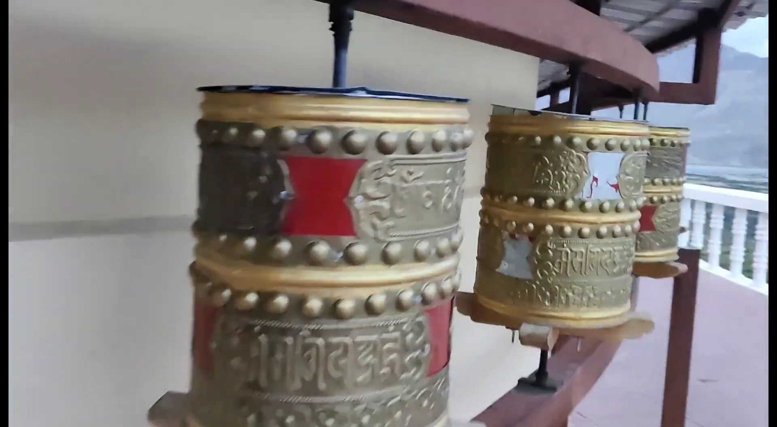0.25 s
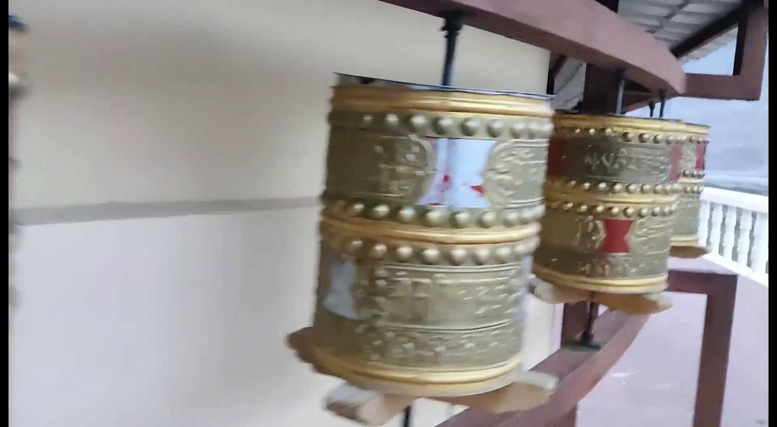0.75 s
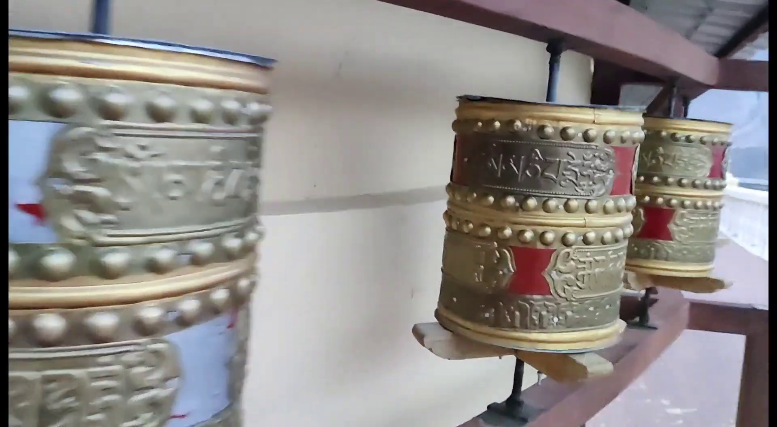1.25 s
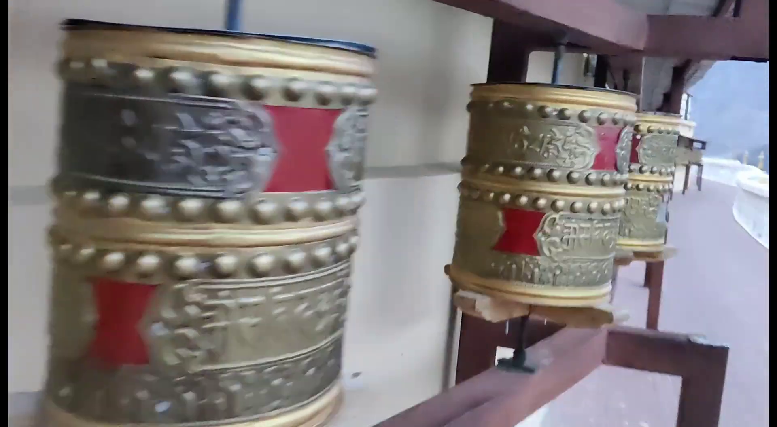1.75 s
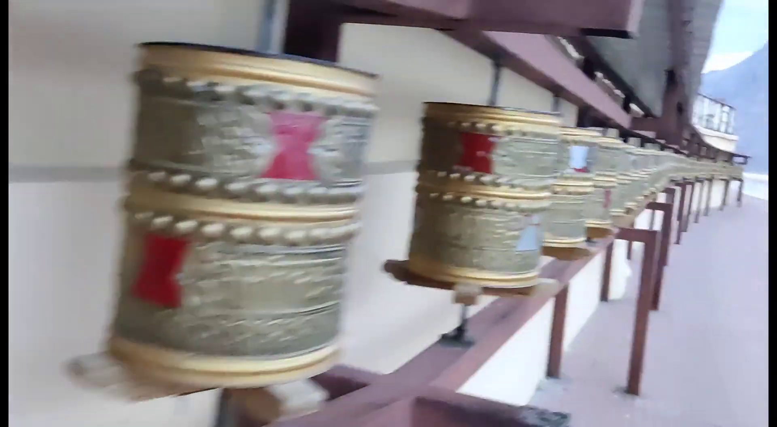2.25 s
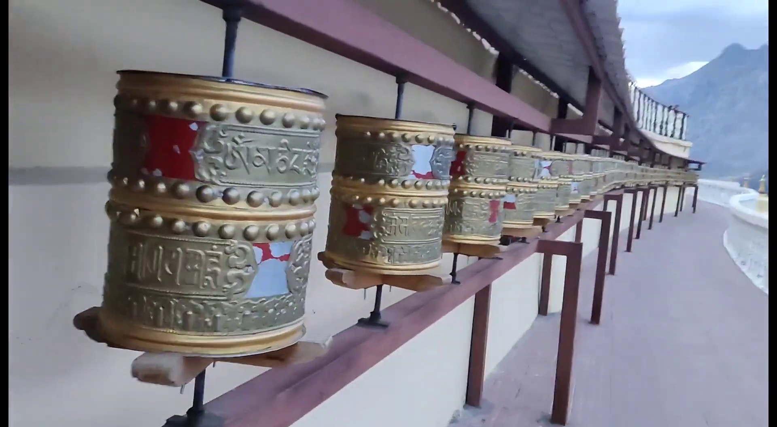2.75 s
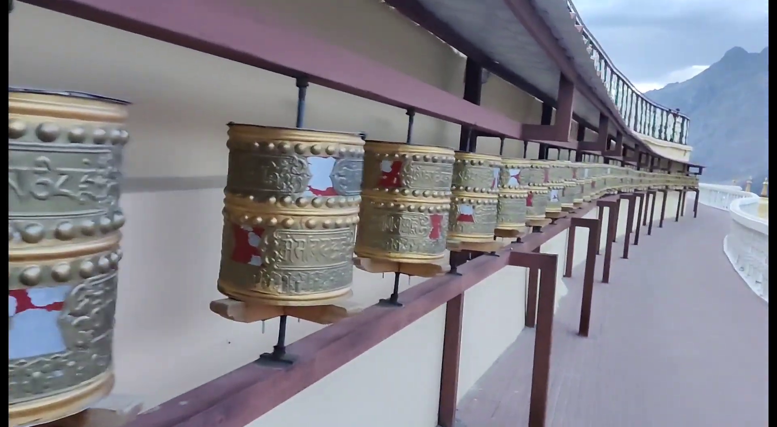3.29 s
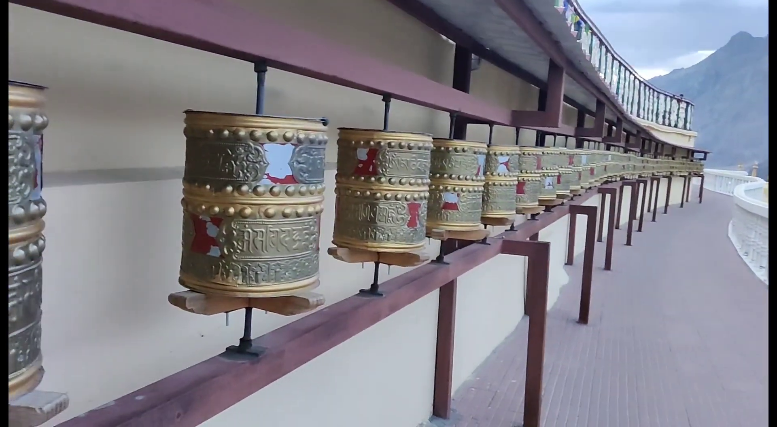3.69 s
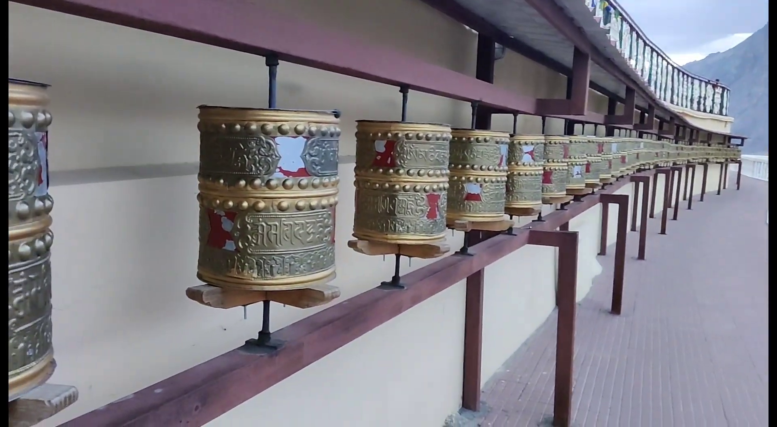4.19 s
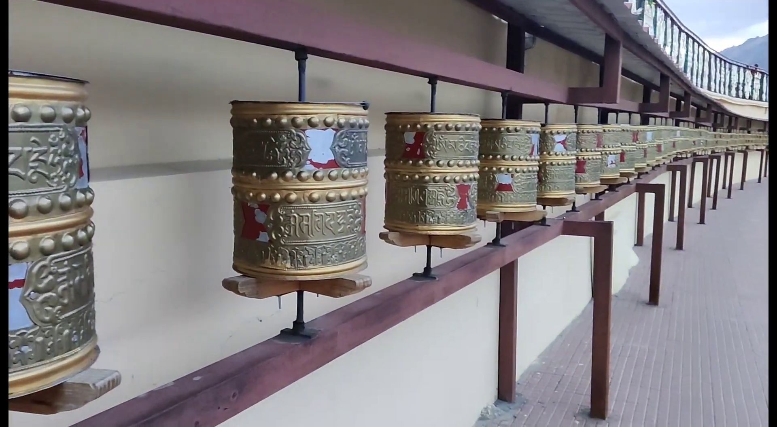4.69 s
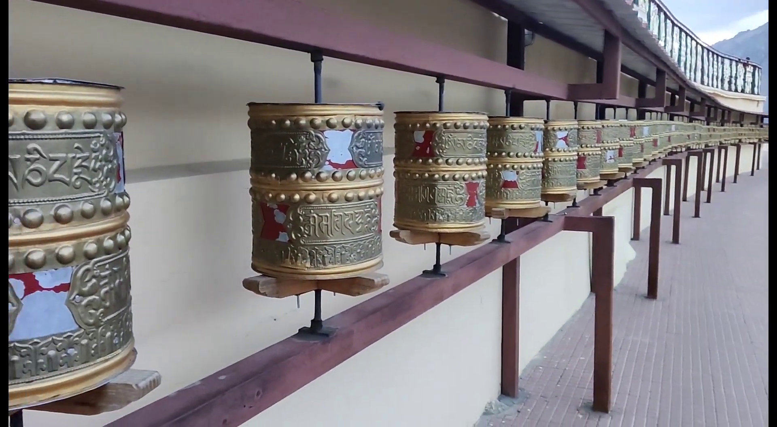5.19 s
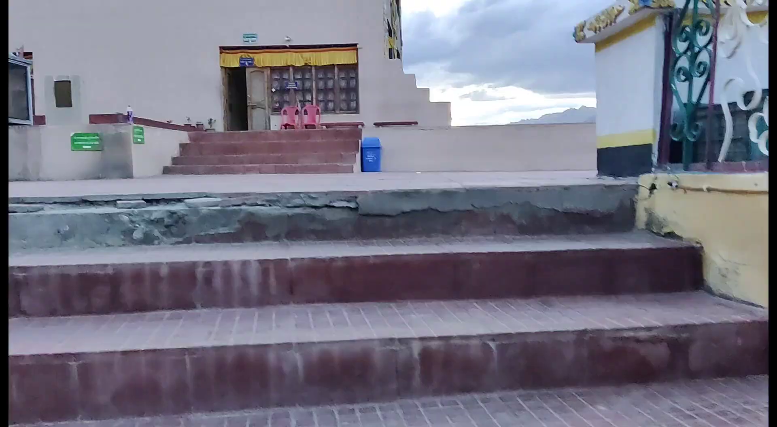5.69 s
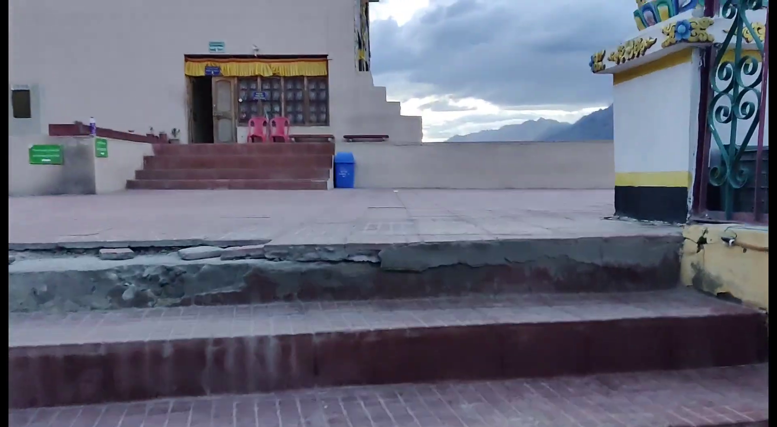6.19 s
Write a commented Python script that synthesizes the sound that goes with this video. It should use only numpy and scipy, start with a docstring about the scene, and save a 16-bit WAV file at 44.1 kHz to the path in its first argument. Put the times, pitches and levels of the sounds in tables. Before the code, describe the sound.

Outdoors beneath a gallery, close to a handheld stereo microphone, loose brass drums are spun in passing. From 0.1 s they knock and chatter on dry iron axles, giving clustered metallic ticks and short, uneven rings, over a wavering low hum and soft wind. Pushes thud at about 0.6 and 0.9 s with wooden clunks and strong knocks; a gust follows, then heavy dull microphone bumps on the left at 1.2-1.35 s. Cloth brushes and axles rub faintly. More shoves come at 1.7-1.8, 2.4 and 2.74 s, the last bringing the brightest, loudest clank. The hum softens and the wheels coast, with irregular knocks, notably at 3.4, 4.15 and 5.4 s. Around 5.68 s everything cuts off. A far quieter place fades in by 6 s: faint bands of hiss, a soft heel thump at 6.04 s and a barely audible step near 6.4 s.

```python
"""A row of embossed brass prayer wheels is spun by hand, one after another, under an outdoor gallery.
The loose drums knock and chatter on their iron axles: bursts of tiny hits set off noise tails and fading tones.
Pushes thud in the frame, wood clunks, dry axles rub and cloth hisses, all made from hits or shaped noise.
Wavering low tones make a hum, and swelling low noise makes wind on the microphone, which is also bumped.
The sound breaks off, and a quieter place fades in, with faint bands of soft hiss and footsteps on stone."""
import sys
import numpy as np
from scipy import signal
from scipy.fft import rfft, irfft, next_fast_len
from scipy.io import wavfile
from scipy.ndimage import uniform_filter1d, map_coordinates

SR = 44100
rng = np.random.default_rng(int(sys.argv[2]) if len(sys.argv) > 2 else 0)


def pcm_store(signal):
    """Save signal as 16-bit PCM."""
    levels = np.round(np.clip(np.atleast_2d(signal), -1, 1) * 32767)
    wavfile.write(sys.argv[1], SR, levels.astype(np.int16).T)


N = 284268
T = np.arange(N) / SR  # time in the whole scene, in seconds
BLOW = np.arange(SR * 2 // 5) / SR  # time within one short sound, in seconds

# In the event tables, level_db is set before the small overall trim of each layer.
# In the spectrum tables, only the shape counts: the layers set their own loudness.
# t60_s is the time a sound takes to die away by 60 dB.

# a drum knocks on its axle: start_s, level_db, chatter_s (2 ms at least), hardness_db_per_octave
KNOCKS = [(0.126, -30, .005, 1.5), (0.139, -25, 0.0013, 2.5), (0.279, -31.5, 0.0045, 2),
          (0.521, -33, 0.0028, 3), (0.534, -24, 0.0024, -5), (0.5728, -29.5, 0.007, 4.5),
          (0.7234, -21, .006, 3), (0.827, -35.5, .002, 1.5), (0.853, -20, 0.0037, -2.5),
          (0.9258, -20.5, .004, 2.5), (0.9476, -19, 0.0023, 8), (1.1151, -29.5, 0.0021, 3.5),
          (1.397, -32.5, .005, -2), (1.423, -29, 0.003, -1.5), (1.505, -24, 0.003, 1.5),
          (1.556, -31.5, .009, 8.5), (1.649, -31, 0.0055, 2), (1.668, -27, .0045, -1.5),
          (1.8084, -26, 0.0096, 1.5), (1.8374, -28, 0.0021, 1), (1.9049, -28, .002, 2),
          (1.948, -28, 0.035, -1.5), (1.9834, -24.5, 0.018, 2), (2.0248, -19.5, 0.0024, 2),
          (2.129, -27.5, .016, 2.5), (2.238, -34, 0.0037, 1), (2.309, -24, 0.0067, 2),
          (2.3228, -22, .002, 0.5), (2.3785, -25.5, .008, 2.5), (2.452, -29.5, 0.0099, -0.5),
          (2.557, -31.5, 0.0073, 1.5), (2.595, -23.5, 0.0045, -0.5), (2.63, -26.5, 0.02, 6),
          (2.7069, -23, 0.01, 8), (2.7414, -15, 0.0026, 7), (2.809, -22, .005, 9.5),
          (2.8225, -23.5, 0.0018, 8), (2.859, -22.5, 0.016, 3.5), (2.919, -28.5, 0.0027, 9),
          (3.132, -27, 0.016, 6), (3.176, -35, .01, -3), (3.264, -28, .012, 4.5), (3.2979, -28.5, 0.007, 4),
          (3.405, -20.5, 0.0047, 4), (3.4357, -27.5, 0.005, 3), (3.5709, -30.5, .003, 1.5),
          (3.617, -35, 0.03, 2), (3.719, -40.5, 0.0037, 1), (3.8015, -30, 0.0016, 3),
          (3.916, -29.5, 0.038, 0.5), (4.001, -26, 0.0065, 2), (4.0395, -25, 0.0084, 1),
          (4.0961, -25.5, 0.0097, 2), (4.1494, -20.5, 0.0047, 11), (4.2822, -26.5, .002, 5.5),
          (4.347, -46, 0.0023, 1), (4.3805, -31, 0.0079, 4), (4.439, -28, .002, 1.5), (4.559, -29, .01, 2),
          (4.602, -31, .003, 1), (4.656, -36.5, 0.0071, 3), (4.678, -32, 0.0077, 2.5),
          (4.718, -37, 0.02, -4), (4.7601, -28, 0.0049, 3), (4.833, -29.5, 0.01, 0.5),
          (4.886, -26.5, 0.011, 3.5), (4.934, -35, 0.0092, 0.5), (5.117, -31.5, 0.024, 1),
          (5.1472, -25, .009, 3), (5.208, -35, 0.0073, -1), (5.245, -29.5, 0.026, 0),
          (5.2926, -28.5, 0.0085, 0.5), (5.4054, -21, 0.0035, 2), (5.439, -27, 0.029, 1),
          (5.5039, -30, .012, 1), (5.642, -34.5, 0.0019, -4)]
# loudness of the axle rattle over time: time_s, level_db
RATTLE_LEVEL = [(0.0, -35.5), (0.12, -39), (0.3, -42), (0.39, -49), (0.47, -54), (0.7, -37), (1.22, -32),
                (1.48, -43.5), (1.6, -33.5), (1.78, -46), (1.89, -40), (1.97, -38), (2.2, -35.5),
                (2.53, -38), (2.8, -29), (3.04, -39.5), (3.2, -30.5), (3.34, -33), (3.53, -43.5),
                (3.68, -44.5), (3.88, -43.5), (4.08, -34.5), (4.5, -40), (4.83, -38), (5.05, -43.5),
                (5.6, -42.5)]
# a knock leaves one group of drum tones singing: start_s, centre_pitch_hz, level_db, t60_s
SINGING_TONES = [(0.279, 2050, -43, 0.81), (0.521, 880, -37, 0.78), (0.534, 713, -34.5, 0.27),
                 (0.573, 1680, -30, 0.27), (0.723, 1693, -25.5, 0.17), (0.723, 2530, -42, 0.15),
                 (0.853, 1850, -28.5, 0.26), (0.853, 1237, -31, 0.23), (0.853, 905, -39, 0.35),
                 (0.948, 2046, -24.5, 0.46), (1.115, 892, -35.5, 0.63), (1.505, 2020, -32.5, 0.28),
                 (1.668, 1330, -52, .5), (1.837, 2460, -29, 0.25), (2.025, 1676, -31, .3),
                 (2.025, 2810, -30, 0.22), (2.63, 1658, -25, 0.54), (2.741, 4350, -32.5, 0.16),
                 (2.809, 2590, -26.5, 0.44), (2.859, 3101, -31, 0.19), (2.919, 842, -35.5, .4),
                 (3.132, 1590, -34, 0.41), (3.298, 1600, -29, 0.24), (3.405, 2713, -29.5, 0.25),
                 (3.571, 4276, -39, 0.32), (4.149, 2525, -32, 0.29), (4.282, 1624, -33.5, .5),
                 (4.602, 1655, -34.5, 0.26), (4.76, 1630, -37, .48), (4.886, 4393, -32, 0.4),
                 (5.293, 1670, -38, 0.33)]
# an axle rubs in one resonance of its drum: crest_s, half_length_s, pitch_hz, width_hz, level_db,
# glide_hz_per_s
RUBS = [(0.06, 0.088, 2970, 450, -49, 0), (1.246, 0.096, 3050, 398, -41, 0),
        (2.195, .074, 3170, 300, -38, -1200), (3.665, 0.062, 4285, 120, -51, 0),
        (4.084, .07, 4300, 120, -45, 0), (4.068, 0.06, 2170, 200, -37, -6000),
        (5.192, 0.044, 2220, 248, -39, -5000), (5.629, 0.045, 3360, 299, -45.5, 2)]
# the hand shoves a wheel by its wooden handle: start_s, frame_thud_db, sharp_tick_db
PUSHES = [(0.134, -30, -34.5), (0.568, -35, -40), (0.854, -19.5, -39), (0.935, -25, -52.5),
          (1.668, -29, -34.5), (1.826, -28.5, -57), (2.3793, -23, -30.5), (2.74, -29.5, -36.5)]
# a wooden handle clunks and shudders: start_s, level_db, chatter_s (2 ms at least)
CLUNKS = [(0.13, -32, 0.0076), (0.725, -42, 0.012), (0.857, -31.5, 0.014), (0.952, -42, 0.012),
          (2.321, -31, 0.032), (2.385, -32, 0.044), (2.595, -33, 0.002), (2.705, -36.5, .005),
          (2.745, -31.5, .012), (2.823, -33.5, .012), (4.172, -44.5, 0.018)]
# a sleeve brushes over a drum: crest_s, half_length_s, level_db
SWISHES = [(0.06, 0.08, -41.5), (0.25, 0.1, -36.5), (1.27, 0.15, -40.5), (2.16, 0.17, -38),
           (2.85, 0.078, -37), (3.04, 0.26, -44.5)]

# spectrum of the sheet-brass drum: frequency_hz, level_db_per_hz
SHELL_SPECTRUM = [(290, -41.5), (500, -10.5), (740, -9), (900, -5), (1200, -6.5), (1600, 0.5), (2000, 0.5),
                  (2500, 1), (3400, -2.5), (4400, -5.5), (5200, -7.5), (6000, -9), (8000, -22),
                  (15500, -42)]
# the drum's clearest tones before random detuning, many in close pairs: pitch_hz, level_db
DRUM_TONES = [(680, -7.5), (800, -6), (890, -3), (1380, -1), (1490, 5.5), (1650, 4.5), (1705, -2.5),
              (1845, -1), (2085, -23), (2430, 3), (2545, 1), (2680, -4.5), (3270, -1.5), (4275, -4.5),
              (4330, -3), (4405, 0.5), (4700, -7.5), (5260, -17), (5730, -1.5), (5810, -2)]
# spectrum of the shaken frame: frequency_hz, level_db_per_hz
FRAME_SPECTRUM = [(40, -20), (90, -1.5), (135, 2.5), (175, -1), (230, -4), (300, -6.5), (430, -6),
                  (550, -14), (800, -11.5), (1500, -37.5), (4000, -72)]
# spectrum of hard metal contact: frequency_hz, level_db_per_hz
EDGE_SPECTRUM = [(3000, -37.5), (6000, 28.5), (7500, 17.5), (10000, 17), (15000, -7.5)]
# a soft hand mutes the frame's upper range: frequency_hz, gain_db
PALM_MUTING = [(170, 0.5), (450, -16.5)]
# spectrum of knocking wood: frequency_hz, level_db_per_hz
WOOD_SPECTRUM = [(100, -24.5), (220, -3), (340, -0.5), (480, -3), (650, -2), (900, -8.5), (1400, -13),
                 (4000, -39)]
# spectrum of brushing cloth: frequency_hz, level_db_per_hz
CLOTH_SPECTRUM = [(800, -20.5), (2300, 11), (3200, 24), (4000, 16), (6000, 16.5), (8000, 2.5), (14500, 1.5)]
# typical dying time of drum and gallery: frequency_hz, t60_s
DYING_TIME = [(150, 0.29), (800, 0.69), (2200, 0.45), (5500, 0.22), (8000, 0.15), (14000, 0.2)]
# how alike left and right are: frequency_hz, likeness (1 = the same, 0 = unrelated)
LEFT_RIGHT_LIKENESS = [(100, 0.77), (300, 1), (700, 0.087), (2000, 0.2), (10000, 0.02)]
# loudness difference between the sides: frequency_hz, left_minus_right_db
LEFT_RIGHT_BALANCE = [(100, 4), (400, -1), (700, 1.5), (1300, -1.5), (2400, -6), (4400, -8.5), (6000, -8.5),
                      (8100, 4.5), (15000, -2.5)]

# spectrum of wind shaking the microphone: frequency_hz, level_db_per_hz
BUFFET_SPECTRUM = [(11, -46.5), (18, 3), (38, 6), (75, -8.5), (100, -9.5), (125, -22.5), (170, -27.5),
                   (230, -43), (400, -61)]
# gusts on the microphone: crest_s, half_length_s, level_db
GUSTS = [(0.65, 0.46, -31), (0.95, 0.16, -21), (1.26, 0.18, -26), (1.55, 0.3, -28.5), (3.21, 0.06, -25),
         (4.72, 0.037, -27), (5.09, 0.038, -29.5), (6.42, 0.1, -39.5)]
# spectrum of the soft rush of air: frequency_hz, level_db_per_hz
AIR_SPECTRUM = [(30, -0.5), (120, -3), (200, -16), (450, -22), (1200, -25.5), (1450, -22), (1750, -24.5),
                (2700, -22.5), (3350, -23), (4000, -24), (5200, -20.5), (7000, -37.5), (15000, -42)]
# loudness of the hum over time: time_s, level_db
HUM_LEVEL = [(0.0, -32), (0.85, -31.5), (2.5, -35.5), (2.95, -40.5), (5.7, -40.5), (5.9, -78), (6.44, -49)]
# faint narrow bands of soft hiss after the break: crest_s, half_length_s, centre_hz, width_hz, level_db
SOFT_HISSES = [(5.96, .11, 1380, 85, -65), (6.15, 0.15, 1480, 190, -65), (5.95, 0.046, 3260, 400, -64),
               (6.17, 0.13, 3240, 810, -60)]
# the hand bumps the microphone: start_s, level_db, pitch_hz, t60_s, left_minus_right_db
BUMPS = [(1.19, -11, 41, 0.096, 20), (1.188, -20.5, 152, 0.049, 26), (1.192, -24, 230, 0.035, 25),
         (1.247, -23, 104, 0.088, 26), (1.268, -21, 138, 0.034, 29), (1.347, -21, 47.7, 0.12, 24),
         (5.640, -22, 259, .025, -23)]
# shoes on stone: start_s, heel_thump_db, sole_slap_db, slap_centre_hz
STEPS = [(6.036, -35, -44.5, 2090), (6.05, -42, -57, 2300), (6.381, -62, -55.5, 1000),
         (6.424, -58, -57, 995)]
# spectrum of the heel: frequency_hz, level_db_per_hz
HEEL_SPECTRUM = [(35, -24), (70, 11), (200, 5.5), (290, 3), (335, 16.5), (385, 2), (435, 6.5), (560, -10),
                 (700, -4), (1200, -32), (4000, -61.5)]
# the break and the fade back in: time_s, gain_db
FADE = [(0, 0), (5.676, 0), (5.681, -42), (5.72, -60), (5.79, -24), (5.88, -16), (5.97, -2), (6.03, 0)]

BREAK_S, TOP_HZ = 5.69, 15850  # when the wheels stop being heard; upper limit of the sound
BREEZE_DB, SHELTERED_DB = -34, -57  # steady buffeting before and after the break
LAST_PUSH_S = PUSHES[-1][0]
RUMBLE_DB = -40.5  # average level of the shaking frame until the last push
RUMBLE_FOLLOWS = 0.36  # its share of the rattle's swells
COAST_DB_PER_S = 2  # the frame rumble dies as the wheels coast after the last push
RUSTLE_DB, RUSTLE_STOP_S = -50, 0.15  # clothes rustle in the walk, and fall still after the last push
DRUM_T60_S = 0.2  # dying time of a drum tone at 2000 Hz


def amp(db):
    """Turn decibels into a gain."""
    return 10 ** (np.asarray(db) / 20)


def unit(x):
    """Scale x to an average (rms) level of 1."""
    return x / np.sqrt(np.mean(x ** 2) + 1e-20)


def crest(x):
    """Scale x so that its loudest 10 ms has an rms level of 1."""
    power = uniform_filter1d(np.mean(x ** 2, 0), size=441)
    return x / np.sqrt(power.max() + 1e-20)


def along(points, hz):
    """Read a curve of (frequency, value) points on a log frequency axis."""
    f, v = np.transpose(sorted(map(tuple, points)))
    return np.interp(np.log(hz + 1), np.log(f + 1), v)


def level_curve(rows):
    """Draw (time, level) rows as one level per sample."""
    s, db = np.transpose(rows)
    return np.interp(T, s, db)


def wobble(rate):
    """Make a smooth random curve with rate new points a second."""
    return map_coordinates(rng.standard_normal(int(N * rate / SR) + 4), [T * rate])


def swells(rows):
    """Add up the power of bell-shaped swells, one for each (crest_s, half_length_s, level_db) row."""
    return sum(amp(db) ** 2 * np.exp(-2 * ((T - s) / half) ** 2) for s, half, db in rows)


def filtered(x, response):
    """Multiply the spectrum of x by a response of frequency."""
    n = x.shape[-1]
    m = next_fast_len(n + 4096, True)
    return irfft(rfft(x, m) * response(np.fft.rfftfreq(m, 1 / SR)), m)[..., :n]


def colour(x, spectrum):
    """Give x a spectrum shape with a filter that never acts early, so attacks stay sharp."""
    cepstrum = irfft(np.log(amp(along(spectrum, np.fft.rfftfreq(4096, 1 / SR)))))
    one_sided = cepstrum * np.r_[1, np.full(2047, 2), np.zeros(2048)]  # minimum phase
    kernel = irfft(np.exp(rfft(one_sided)))
    return signal.fftconvolve(x, kernel[None], axes=1)[:, :x.shape[1]]


def band(x, hz, width_hz):
    """Pass x through one resonance, then scale it to rms 1."""
    return unit(filtered(x, lambda f: np.exp(-2 * ((f - hz) / width_hz) ** 2)))


def spread(pair, alike):
    """Mix two unrelated signals to the given left-right likeness."""
    def turn(hz):
        return np.arccos(np.clip(along(alike, hz), -1, 1)) / 2
    mid, side = filtered(pair, lambda hz: np.array([np.cos(turn(hz)), np.sin(turn(hz))]))
    return np.array([mid + side, mid - side])


def stereo_noise(n, alike):
    """Make n samples of white noise with the given left-right likeness."""
    return spread(rng.standard_normal((2, n)), alike)


def add(track, s, sound):
    """Mix a sound into the track at time s, cutting it at the track's end."""
    part = track[:, round(s * SR):][:, :sound.shape[1]]
    part += sound[:, :part.shape[1]]


def wind():
    """A breeze and its gusts buffet the two sides unequally, over the soft rush of the open valley."""
    lean_db, air_db = 3, -53.5  # buffeting, left minus right; level of the rush
    buffet = unit(colour(stereo_noise(N, [(25, 0.21), (90, 0.24)]), BUFFET_SPECTRUM))
    air = unit(colour(stereo_noise(N, [(150, 0.83), (900, 0.15)]), AIR_SPECTRUM))
    breeze = amp(np.where(T < BREAK_S, BREEZE_DB, SHELTERED_DB))
    strength = np.sqrt(breeze ** 2 + swells(GUSTS))
    return strength * buffet * amp([[lean_db / 2], [-lean_db / 2]]) + amp(air_db) * air


def wavering_tone(hz, drift_hz=1.18):
    """A sine whose pitch and loudness both wander at random."""
    phase = 2 * np.pi * np.cumsum(hz + drift_hz * wobble(6)) / SR
    return np.sqrt(2) * np.sin(phase) * amp(1.44 * wobble(10))


def hum(upper_hz=116, lower_hz=101, upper_db=-3.0, lower_db=-7, overtone_db=-15):
    """Distant machinery drones on two wavering low tones, with a weaker one a fifth above the upper."""
    upper = amp(upper_db) * wavering_tone(upper_hz)
    lower = amp(lower_db) * wavering_tone(lower_hz)
    fifth = amp(overtone_db) * wavering_tone(upper_hz * 1.5)
    return amp(level_curve(HUM_LEVEL)) * (upper + lower + fifth)


def soft_hisses():
    """Faint narrow bands of soft hiss, made from filtered noise, swell and sink after the break."""
    out = np.zeros((2, N))
    for s, half, hz, width_hz, db in SOFT_HISSES:
        out += band(rng.standard_normal((2, N)), hz, width_hz) * np.sqrt(swells([(s, half, db)]))
    return out


def bumps(rise_s=0.00084):
    """Bumps on the microphone are dull, fast-fading low tones, each close to one side."""
    out = np.zeros((2, N))
    for s, db, hz, t60, pan_db in BUMPS:
        thump = np.sin(2 * np.pi * hz * BLOW) * amp(db - 60 * BLOW / t60) * (1 - np.exp(-BLOW / rise_s))
        add(out, s, thump * amp([[pan_db / 2], [-pan_db / 2]]))
    return out


def steps(t60=0.12, click=5, slope_db=-10):
    """The rubber heel thumps on the stone as the sole clicks down and dies quickly."""
    out = np.zeros((2, N))
    impulse = np.array([BLOW == 0] * 2, float)
    heel = crest(colour(impulse, HEEL_SPECTRUM))
    for s, heel_db, sole_db, hz in STEPS:
        scrape = stereo_noise(len(BLOW), [(300, 0.79), (2000, 0.26)]) * amp(-60 * BLOW / t60)
        sole_spectrum = [(hz / 10, slope_db), (hz, 0), (hz * 2, slope_db), (hz * 10, -60)]
        sole = crest(colour(click * impulse + scrape, sole_spectrum))
        add(out, s, amp(heel_db) * heel + amp(sole_db) * sole)
    return out


def sleeve():
    """Cloth hisses softly while walking, and swells as the arm reaches for the next wheel."""
    hiss = unit(colour(stereo_noise(N, LEFT_RIGHT_LIKENESS), CLOTH_SPECTRUM))
    falling_still = np.exp(-np.maximum(T - LAST_PUSH_S, 0) / RUSTLE_STOP_S)
    walking = amp(RUSTLE_DB + 0.64 * wobble(1.3)) * falling_still
    return np.sqrt(swells(SWISHES) + walking ** 2) * hiss


def contacts(n, rate, scatter_db):
    """Random tiny impacts of uneven size, about rate of them a second."""
    happens = rng.random(n) < rate / SR
    size = amp(scatter_db * np.clip(rng.standard_normal(n), -2, 2))
    return happens * rng.choice([-1, 1], n) * size


def chattering(length, hardness=0, first_contact=1.85, firmer_db=0.24, seat_s=0.00091):
    """A first touch, firmer in a hard knock, then contacts that build as the parts meet and die away."""
    fade = np.exp(-BLOW / max(length, 0.002))
    build = 2 * (1 - np.exp(-BLOW / seat_s))
    hits = contacts(len(BLOW), rate=900, scatter_db=3) * fade * build
    hits[0] = first_contact * amp(firmer_db * hardness)
    return hits


def struck(hits, answer):
    """Every contact sets off the same answer."""
    return signal.fftconvolve(hits[None], answer, axes=1)[:, :len(BLOW)]


def shimmer(direct, uneven_db, linger):
    """Answer to one impact: a click, then noise standing for thin-sheet tones and wall echoes dying away."""
    hz, t, z = signal.stft(rng.standard_normal((2, len(BLOW))), SR, nperseg=256)
    # each striking point favours other frequencies, which are louder and last longer
    favoured = np.clip(rng.standard_normal((len(hz), 1)), -2, 2)
    t60 = along(DYING_TIME, hz)[:, None] * np.exp(linger * favoured)
    tail = signal.istft(z * amp(uneven_db * favoured - 60 * t / t60), SR)[1][:, :len(BLOW)]
    tail = spread(tail, LEFT_RIGHT_LIKENESS)
    tail /= np.linalg.norm(tail[0])
    tail[:, 0] += direct
    return tail


def drum_tones(t60, detune, scatter_db, damping=0.51):
    """One drum's clear tones: no two drums are tuned alike, and high tones die sooner."""
    hz, db = np.transpose(DRUM_TONES)
    tune, size, left, right = rng.standard_normal((len(hz), 4)).T
    life = t60 * (hz / 2000) ** -damping
    turning = 2j * np.pi * hz * (1 + detune * tune)
    ringing = np.exp((turning - np.log(1000) / life)[:, None] * BLOW)
    phase = np.array([2 * left, 2 * left + right])
    weight = amp(db + scatter_db * size) * np.exp(1j * phase)
    return (weight @ ringing).real


def ticks(trim_db=-7, rate=9, t60=0.035, count=6):
    """Loose rims and studs tap lightly as the drums shake, each with its own short, dry ring."""
    out = np.zeros((2, N))
    for stud in range(count):
        click = stereo_noise(len(BLOW), LEFT_RIGHT_LIKENESS) * amp(-60 * BLOW / t60)
        ring = crest(drum_tones(t60=t60, detune=0.02, scatter_db=4))
        tap = crest(colour(click, SHELL_SPECTRUM)) + ring
        out += signal.fftconvolve(contacts(N, rate, scatter_db=2.5)[None], tap, axes=1)[:, :N]
    return amp(level_curve(RATTLE_LEVEL) + trim_db) * unit(out)


def rubs(slips_per_s=220, catch_db=3):
    """A dry axle slips in uneven spurts; its wheel answers in a resonance that may slide as it turns."""
    out = np.zeros((2, N))
    for s, half, hz, width_hz, db, glide in RUBS:
        start = max(s - BLOW[-1] / 2, 0)
        t = start + BLOW - s  # time from the crest
        slips = np.array([contacts(len(BLOW), slips_per_s, scatter_db=3.5) for side in range(2)])
        slide = np.exp(1j * np.pi * glide * t ** 2)
        rub = (signal.hilbert(band(slips, hz, width_hz)) * slide).real
        add(out, start, rub * amp(db) * np.exp(-(t / half) ** 2))
    return spread(out, LEFT_RIGHT_LIKENESS) * amp(catch_db * wobble(31))


def clunks(t60=0.12):
    """Wood knocks against wood: a hollow, quickly damped clatter."""
    out = np.zeros((2, N))
    for s, db, chatter in CLUNKS:
        body = stereo_noise(len(BLOW), LEFT_RIGHT_LIKENESS) * amp(-60 * BLOW / t60)
        add(out, s, amp(db) * crest(colour(struck(chattering(chatter), body), WOOD_SPECTRUM)))
    return out


def pushes(trim_db=-3, jolt_s=0.012, snap_s=0.0058):
    """Each shove jolts the frame and snaps the axle against its bearing."""
    out = np.zeros((2, N))
    for s, thud_db, tick_db in PUSHES:
        answer = shimmer(direct=0.3, uneven_db=2.5, linger=0.11)
        jolt = colour(struck(chattering(jolt_s), answer), FRAME_SPECTRUM)
        thud = crest(colour(jolt, PALM_MUTING))
        tick = crest(colour(struck(chattering(snap_s), answer), EDGE_SPECTRUM))
        add(out, s, amp(trim_db) * (amp(thud_db) * thud + amp(tick_db) * tick))
    return out


def rattle(trim_db=-2.0, ring_db=-6, edge_db=-26, rate=15):
    """Between knocks the turning drums keep jiggling on their dry bearings, tick by tick."""
    rattle_db = level_curve(RATTLE_LEVEL)
    coasting_s = np.maximum(T - LAST_PUSH_S, 0)
    frame_db = RUMBLE_DB + RUMBLE_FOLLOWS * (rattle_db - rattle_db.mean()) - COAST_DB_PER_S * coasting_s
    clatter, ring = np.zeros((2, 2, N))
    for wheel in range(6):
        hits = contacts(N + len(BLOW) - 1, rate, scatter_db=3.0)[None]
        rub = amp(1.6 * wobble(3.934))  # each drum rubs now harder, now softer
        answer = shimmer(direct=0.3, uneven_db=3.8, linger=0.12)
        tones = drum_tones(t60=DRUM_T60_S, detune=0.005, scatter_db=3.5)
        clatter += rub * signal.fftconvolve(hits, answer, "valid", axes=1)
        ring += rub * signal.fftconvolve(hits, tones, "valid", axes=1)
    shell = unit(colour(clatter, SHELL_SPECTRUM)) + amp(ring_db) * unit(ring)
    pressure = amp(0.5 * (rattle_db - rattle_db.max()))  # a harder rattle has a brighter edge
    edge = amp(edge_db) * pressure * unit(colour(clatter, EDGE_SPECTRUM))
    frame = amp(frame_db) * unit(colour(clatter, FRAME_SPECTRUM))
    return amp(rattle_db + trim_db) * (shell + edge) + frame


def singing(trim_db=-0.5, width_hz=26, count=5):
    """Some knocks leave a few close drum tones beating against each other as they die."""
    out = np.zeros((2, N))
    for s, hz, db, t60 in SINGING_TONES:
        offset, left, right = rng.standard_normal((count, 3)).T[:, :, None]
        start_phase = np.array([2 * left, 2 * left + right])
        phase = 2 * np.pi * (hz + width_hz * offset) * BLOW + start_phase
        rise = 1 - np.exp(-BLOW / 0.0008)
        to_silence = 1 - BLOW / BLOW[-1]
        ring = np.sin(phase).sum(1) * amp(-60 * BLOW / t60) * rise * to_silence
        add(out, s, amp(db + trim_db) * crest(ring))
    return out


def knocks(trim_db=-2, ring_db=-5, thud_db=-16, edge_db=-34, edge_per_hardness_db=1.0):
    """A drum falls against its axle and chatters there; shell and frame answer."""
    out = np.zeros((2, N))
    wheels = [drum_tones(t60=DRUM_T60_S, detune=0.0055, scatter_db=5.5) for _ in range(10)]
    for k, (s, db, chatter, hardness) in enumerate(KNOCKS):
        hits = chattering(chatter, hardness)
        clatter = struck(hits, shimmer(direct=0.36, uneven_db=2.6, linger=0.14))
        ring = crest(struck(hits, wheels[k % len(wheels)]))
        shell = crest(colour(clatter, SHELL_SPECTRUM)) + amp(ring_db) * ring
        # hard contacts favour the upper tones
        shell = crest(colour(shell, [(750, -2 * hardness), (6000, hardness)]))
        frame = amp(thud_db) * crest(colour(clatter, FRAME_SPECTRUM))
        tick_db = edge_db + edge_per_hardness_db * hardness
        tick = amp(tick_db) * crest(colour(clatter, EDGE_SPECTRUM))
        add(out, s, amp(db + trim_db) * (shell + frame + tick))
    return out


def from_the_left(x, lag_ms=0.43):
    """The wheels reach the left side first; the balance between the sides changes with frequency."""
    side = np.array([[0.5], [-0.5]])

    def response(hz):
        balance = amp(side * along(LEFT_RIGHT_BALANCE, hz))
        return balance * np.exp(2j * np.pi * hz * side * lag_ms / 1000)
    return filtered(x, response)


def scene():
    """The wheels sound until the break; hum and wind go on after it."""
    drums = knocks() + singing() + rattle() + rubs() + ticks()
    handling = pushes() + clunks() + sleeve()
    wheels = from_the_left(drums + handling) * (T < BREAK_S)
    return wheels + hum() + wind() + soft_hisses() + bumps() + steps()


def record(dry):
    """An abrupt break, a fade back in, and nothing kept above the top frequency."""
    return filtered(dry * amp(level_curve(FADE)), lambda hz: hz < TOP_HZ)


dry = scene()
out = record(dry)
pcm_store(out)
```